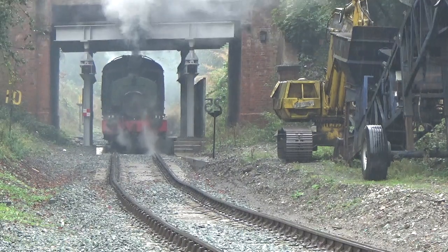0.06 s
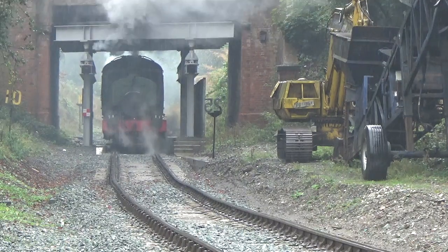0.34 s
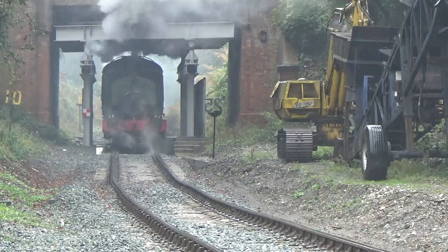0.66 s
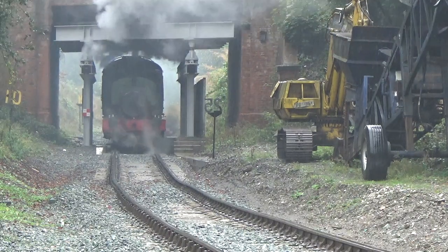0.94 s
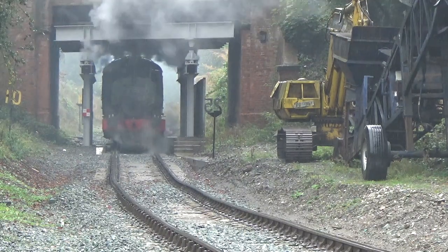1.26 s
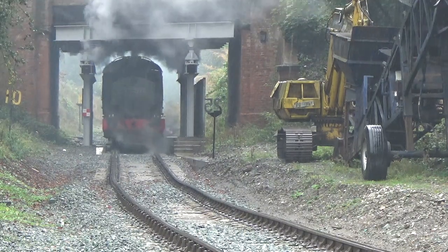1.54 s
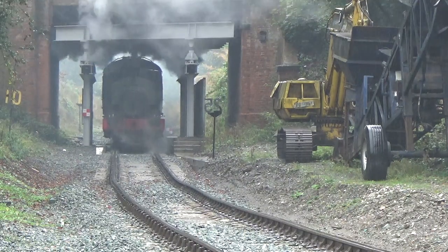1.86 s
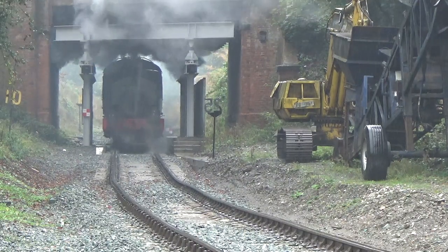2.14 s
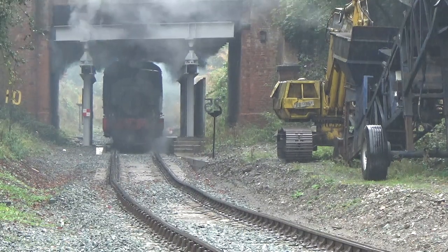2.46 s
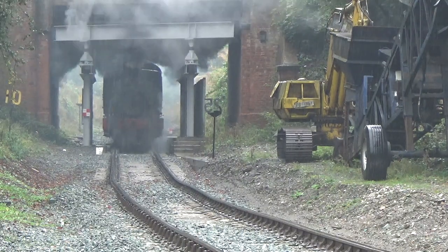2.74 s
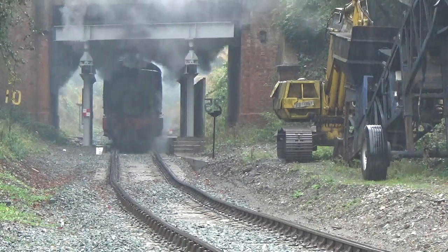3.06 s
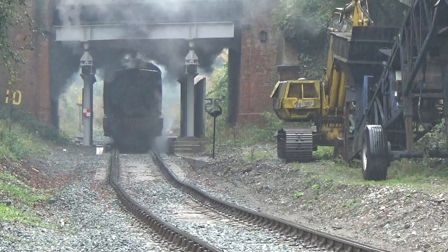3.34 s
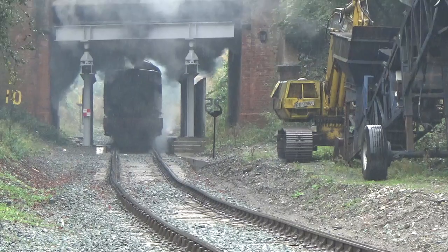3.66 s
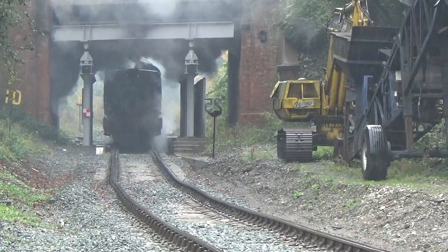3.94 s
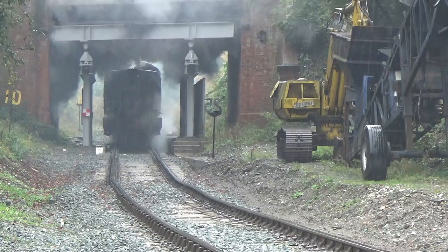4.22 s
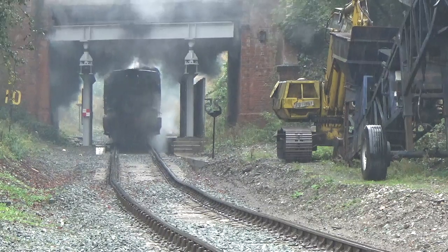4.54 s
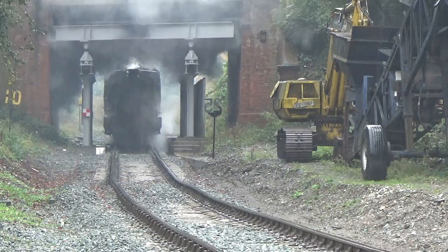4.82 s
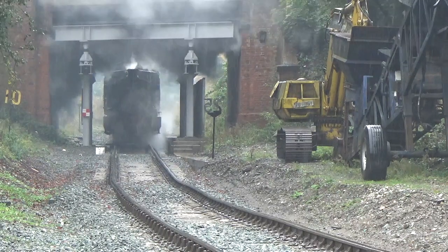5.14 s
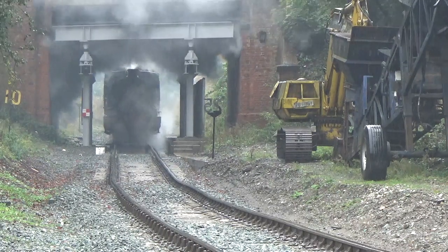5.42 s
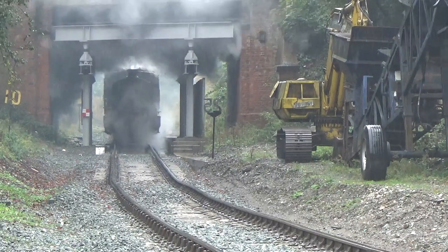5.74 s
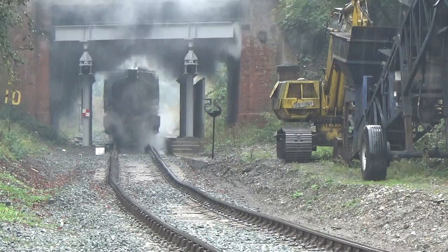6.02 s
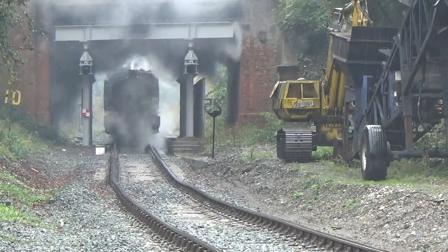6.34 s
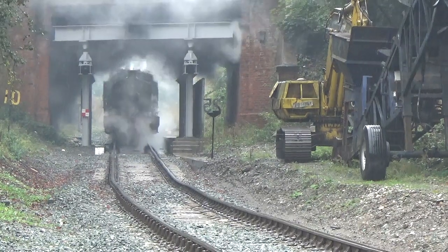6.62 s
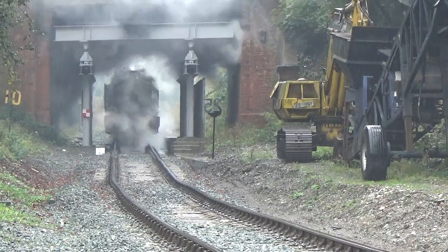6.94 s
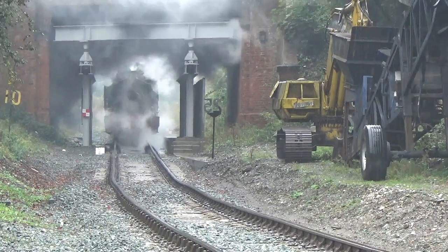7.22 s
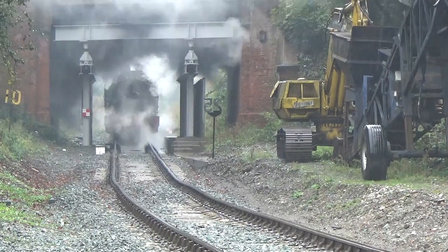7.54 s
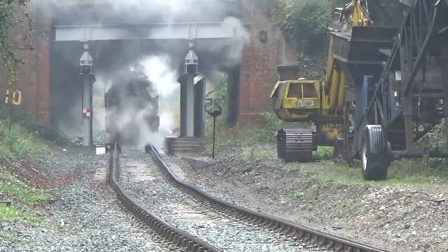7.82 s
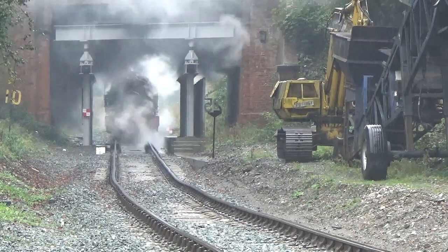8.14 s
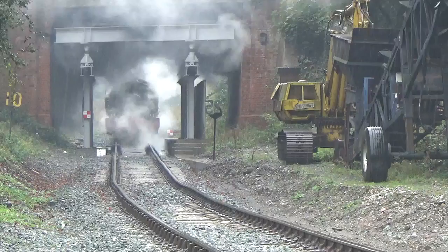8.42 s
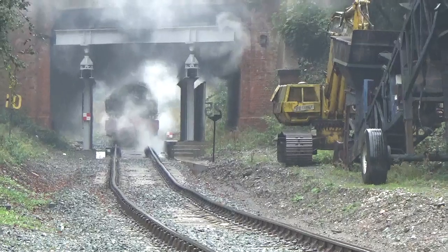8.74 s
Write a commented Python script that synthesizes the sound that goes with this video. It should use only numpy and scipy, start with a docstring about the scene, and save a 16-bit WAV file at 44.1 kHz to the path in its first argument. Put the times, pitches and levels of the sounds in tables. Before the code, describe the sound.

A steam locomotive pulls slowly away under a bridge, heard outdoors from down the track. A broad, steady hiss of steam dominates all nine seconds, with faint wavering howls inside it, slight short echoes and a quiet low rumble beneath. Softer raspy chuffs run throughout in uneven groups of four, each group lasting about a second and a half.

The steam spurts and sizzles at the start, near 2.6 seconds and near 5.9. Faint short hoots come at about 0.7, 1 and 5.3 seconds. Water spits with a sharp snap at 4.9 seconds and again, more quietly, at 6. Around 5 seconds the howling shifts slightly higher, with thin whining tones. From about 6 seconds the hiss eases a little, and its harder edge dies away after 8, leaving softer steam, a faint high whine and the continuing beat.

```python
"""Steam hisses and faintly howls from open drain cocks, heard from down the track over a low rumble.
A locomotive moves slowly off under a brick bridge; its chimney beats four uneven chuffs a wheel turn.
Ground and bridge add short echoes to the hiss, whose colour climbs as the engine draws away.
Two slugs of water spit from the cocks around the time it clears the bridge."""
import sys
import numpy as np
from scipy import signal
from scipy.fft import rfft, irfft
from scipy.io import wavfile
from scipy.ndimage import map_coordinates

SR = 44100
rng = np.random.default_rng(int(sys.argv[2]) if len(sys.argv) > 2 else 0)


def bounce(signal):
    """Save signal as a 16-bit WAV file at the path given by the first command-line argument."""
    frames = np.transpose(np.atleast_2d(signal))
    limited = np.clip(frames, -1, 1)
    pcm = np.round(limited * 32767).astype(np.int16)
    wavfile.write(sys.argv[1], SR, pcm)


N = 395577
TIME_S, FREQS_HZ = np.arange(N) / SR, np.fft.rfftfreq(N, 1 / SR)
BAND_LIMIT_HZ = 11060

# Drain cock spectra (broad hiss, hard jet, wet sizzle): freq_hz, relative_db
HISS_SPECTRUM = [(50, -55), (190, -33), (320, -17), (450, -13.5), (730, -10.5), (900, -12), (1650, -9.5),
                 (2030, -3.5), (2400, -1.5), (2950, -2.5), (3350, -4.5), (7800, -7.5), (8650, -12),
                 (13000, -12)]
JET_SPECTRUM = [(300, -55), (1200, -9), (2000, -3), (3300, -1.5), (3750, 5), (4300, 7), (5000, 2),
                (5800, -5.5), (6600, -1.5), (8000, -46)]
SIZZLE_SPECTRUM = [(2000, -60), (6000, -9), (8100, -11), (8700, -5), (9250, 6.5), (10200, 7), (11000, 1)]
# Hiss strength: time_s, level_db
HISS_LEVELS = [(0, -28), (2.6, -26.5), (5.6, -28), (6.3, -30.5), (7.6, -29), (8.97, -31.5)]
# Jet strength; sags, recovers, dies away: time_s, level_db
JET_LEVELS = [(0, -34), (1.6, -31), (4.4, -33.5), (4.75, -38), (5.1, -38), (5.45, -31.5), (6.5, -30.5),
              (6.85, -36), (8, -37), (8.25, -47), (8.97, -50)]
# Spurts of wet steam: peak_s, sigma_s, jet_db, sizzle_db
SPURTS = [(.08, .07, -31.5, -41), (1.15, 0.31, -43, -38), (2.6, .25, -36.5, -36.5), (3.55, 0.22, -43, -38),
          (4.35, .2, -39, -37), (5.85, 0.23, -33, -31.5), (7.02, 0.27, -46, -37), (8.72, 0.26, -51, -37)]
# Reflections off bridge walls and deck: delay_s, gain
BRIDGE_ECHOES = [(.0017, .08), (.0029, -.09), (.0047, .09), (.0068, .09), (.0093, -.07)]
# Steam resonances, under and beyond the bridge: pitch_hz, width_hz, under_db, beyond_db
HOWL_MODES = [(887, 50, -44.5, -48), (992, 60, -39, -39.5), (1058, 70, -50, -40), (1275, 110, -41, -45),
              (1405, 52, -48, -40), (1463, 60, -42, -37), (1715, 110, -38.3, -40), (1876, 60, -45, -41),
              (2190, 130, -40.5, -43), (2572, 70, -41.5, -40), (2747, 60, -47, -38.7),
              (7850, 400, -60, -46)]
# Gain common to those resonances: time_s, gain_db
HOWL_GAINS = [(0, 0), (4.2, 0.5), (5.1, 1), (7.5, -1), (8.97, -5.5)]
# Single resonances flaring into hoots and whines: peak_s, sigma_s, pitch_hz, width_hz, level_db
HOOTS = [(.7, 0.052, 985, 80, -34), (1.04, .06, 1000, 80, -35), (2.55, 0.07, 975, 80, -37.5),
         (3.65, 0.097, 990, 80, -39), (4.8, 0.3, 1760, 55, -38), (4.95, .3, 2610, 75, -37),
         (5.25, 0.051, 995, 77, -33), (5.65, .25, 2745, 65, -35), (7.16, 0.038, 4600, 600, -33),
         (7.45, 0.3, 1470, 100, -37.5), (8.7, 0.48, 6300, 700, -42), (8.75, .28, 10250, 450, -51)]
# Outdoor rumble spectrum: freq_hz, relative_db
RUMBLE_SPECTRUM = [(10, -35), (25, -21), (40, -11), (52, -2), (64, -3.5), (80, -1.5), (105, 3.5), (160, -2),
                   (200, -5), (270, 0), (500, -23.5)]
# Wheel turns: start_s, bark_db, rasp_db
WHEEL_TURNS = [(0.02, -37.5, -36), (1.476, -35.5, -32.5), (2.99, -37, -30.5), (4.513, -37.5, -31.5),
               (6.05, -39.5, -29.6), (7.585, -40.5, -31.5)]
# Four beats of a turn: phase_turns, bark_accent_db, rasp_accent_db
TURN_BEATS = [(0, 3, 1.1), (.263, 2.5, 1.8), (.498, -1.2, 1), (.708, -5, -3)]
# Chuff spectra (rasp, bark, boom): freq_hz, relative_db
RASP_SPECTRUM = [(150, -50), (500, -28), (800, 2), (1060, 1.5), (1150, -5), (1280, 12.5), (1400, 0.5),
                 (1750, -3.5), (2200, 4.5), (2700, -29), (5000, -4), (11000, -33)]
BARK_SPECTRUM = [(60, -55), (160, -30), (250, -16.5), (300, -9), (385, -3.5), (530, -2.5), (650, -4),
                 (740, -12), (850, -1.5), (1100, 1.5), (2000, -45), (6000, -60)]
BOOM_SPECTRUM = [(25, -35), (70, -1), (110, -2.5), (160, 10.5), (200, -13), (300, -22), (1000, -62)]
# Chimney pipe resonances: pitch_hz, width_hz, boost_db
FLUE_MODES = [(322, 32, 7.5), (441, 42, 9)]
# Loudest booms under the bridge: peak_s, level_db
BOOMS = [(0.42, -56), (2.23, -57), (4.57, -51.5), (5.362, -53), (8.72, -54)]
# Water spits: start_s, level_db
SPITS = [(4.888, -12.5), (5.972, -19)]
# Left-right likeness: freq_hz, coherence
STEREO_COHERENCE = [(30, .985), (200, .965), (2000, .96), (5000, .95), (10000, .92)]
# Level, left minus right: freq_hz, lean_db
STEREO_LEAN = [(60, -3), (97, 1), (160, 0), (250, 0), (400, 1), (650, 2), (1050, 1.0), (1700, 2),
               (2730, -0.5), (4400, -0.5), (7100, 1.5), (11400, -1.5)]
# Phase, left ahead of right: freq_hz, lead_rad
STEREO_LEAD = [(200, 0), (1000, .22), (2200, -.3), (4500, -.12), (7500, -.2), (11000, 0)]


def amp(db):
    """Decibels to gain."""
    return 10 ** (np.asarray(db) / 20)


def unit_rms(x):
    """Scale to rms 1."""
    return x / np.sqrt(np.mean(x ** 2) + 1e-20)


def over_freq(table):
    """Table value at every bin, on a log frequency axis."""
    freq_hz, value = np.transpose(table)
    return np.interp(np.log(FREQS_HZ + 1), np.log(freq_hz + 1), value)


def over_time(table):
    """Table value at every sample."""
    return np.interp(TIME_S, *np.transpose(table))


def resonance(pitch_hz, width_hz):
    """Response of one mode, 1 at centre."""
    return 1 / (1 + (1.3 * (FREQS_HZ - pitch_hz) / width_hz) ** 2)


def swell(peak_s, sigma_s):
    """Gaussian envelope, 1 at peak."""
    return np.exp(-.5 * ((TIME_S - peak_s) / sigma_s) ** 2)


def resample(x, position_samples):
    """Both channels read at fractional positions."""
    return np.array([map_coordinates(side, [position_samples], order=3, mode="nearest") for side in x])


def echo(x, delay_s):
    """Copy with a delay that may drift."""
    return resample(x, np.arange(N) - SR * delay_s)


def turbulence(gain):
    """Noise shaped by a gain per bin; rms 1, nearly alike in both ears."""
    a, b, c, d = rng.standard_normal((4, len(FREQS_HZ)))
    coherence = over_freq(STEREO_COHERENCE)
    left = a + 1j * b
    right = coherence * left + np.sqrt(1 - coherence ** 2) * (c + 1j * d)
    return unit_rms(irfft(np.array([left, right]) * gain, N))


def noise(spectrum, boost_db=0):
    """Turbulence from a spectrum table."""
    return turbulence(amp(over_freq(spectrum) + boost_db))


def wander(rate_hz):
    """Random curve, rms 1, rolled off above rate_hz."""
    return unit_rms(irfft(rfft(rng.standard_normal(N)) / (1 + (FREQS_HZ / rate_hz) ** 4), N))


def flutter(rate_hz, rms_db):
    """Randomly wavering gain."""
    return amp(rms_db * wander(rate_hz))


def bridge_fade(under_db, beyond_db, clear_s=5.22, fade_s=0.49):
    """Gain crossfade as the engine clears the bridge."""
    beyond = .5 + .5 * np.tanh((TIME_S - clear_s) / fade_s)
    return amp(under_db) * (1 - beyond) + amp(beyond_db) * beyond


def strokes(last_turn_s=1.526):
    """Piston strokes, four a wheel turn. Rows: start_s, bark_db, rasp_db."""
    lengths_s = np.append(np.diff([turn[0] for turn in WHEEL_TURNS]), last_turn_s)
    return np.array([(start_s + phase_turns * turn_s, bark_db + bark_accent_db, rasp_db + rasp_accent_db)
                     for (start_s, bark_db, rasp_db), turn_s in zip(WHEEL_TURNS, lengths_s)
                     for phase_turns, bark_accent_db, rasp_accent_db in TURN_BEATS])


def stroke_envelope(levels_db, lag_s, rise_s, decay_s):
    """Each stroke: the valve opens smoothly, the cylinder empties. Time constants apply to power."""
    power = np.zeros(N)
    for start_s, level_db in zip(strokes()[:, 0], levels_db):
        age_s = TIME_S - start_s - lag_s
        near = (age_s > -.2) & (age_s < .8)
        falloff = np.where(age_s[near] < 0, (age_s[near] / rise_s) ** 2, age_s[near] / decay_s)
        power[near] += amp(level_db) ** 2 * np.exp(-falloff)
    return np.sqrt(power)


def drain_cocks(throb=0.023):
    """Escaping steam: broad hiss, spurting jet and wet sizzle; all surge slightly with each stroke."""
    jet_power = amp(over_time(JET_LEVELS)) ** 2
    sizzle_power = bridge_fade(under_db=-37, beyond_db=-43) ** 2
    for peak_s, sigma_s, jet_db, sizzle_db in SPURTS:
        spurt = swell(peak_s, sigma_s)
        jet_power += (amp(jet_db) * spurt) ** 2
        sizzle_power += (amp(sizzle_db) * spurt) ** 2
    hiss = noise(HISS_SPECTRUM) * amp(over_time(HISS_LEVELS)) * flutter(rate_hz=11, rms_db=0.74)
    jet = noise(JET_SPECTRUM) * np.sqrt(jet_power) * flutter(rate_hz=17, rms_db=0.66)
    sizzle = noise(SIZZLE_SPECTRUM) * np.sqrt(sizzle_power) * flutter(rate_hz=180, rms_db=1.7)
    surge = stroke_envelope(np.zeros(len(strokes())), lag_s=-0.0091, rise_s=0.021, decay_s=0.13)
    return (hiss + jet + sizzle) * (1 + throb * (surge - surge.mean()))


def add_echoes(steam, comb_hz=2044, climb_hz_per_s=70, drift_per_s=0.0038):
    """Ballast and bridge echoes lag less as the engine recedes, so their comb peaks climb."""
    first_s = BRIDGE_ECHOES[0][0]
    walls = sum(gain * np.exp(-2j * np.pi * FREQS_HZ * (delay_s - first_s))
                for delay_s, gain in BRIDGE_ECHOES)
    bridge = echo(irfft(rfft(steam) * walls, N), first_s * (1 - drift_per_s * TIME_S))
    ground = echo(steam, 1 / (comb_hz + climb_hz_per_s * TIME_S))
    ground_gain = 0.038 + 0.24 * swell(peak_s=6.86, sigma_s=.6)  # strongest just beyond the bridge
    return steam + ground_gain * ground + bridge


def howls(pitch_waver=0.002003):
    """Steam excites wavering resonances; their balance shifts as the engine clears the bridge."""
    held = sum(turbulence(resonance(pitch_hz, width_hz)) * bridge_fade(under_db, beyond_db)
               * flutter(rate_hz=5, rms_db=1.2)
               for pitch_hz, width_hz, under_db, beyond_db in HOWL_MODES)
    hoots = sum(turbulence(resonance(pitch_hz, width_hz)) * amp(level_db) * swell(peak_s, sigma_s)
                for peak_s, sigma_s, pitch_hz, width_hz, level_db in HOOTS)
    speed = 1 + pitch_waver * wander(rate_hz=4)
    return resample(held * amp(over_time(HOWL_GAINS)) + hoots, np.cumsum(speed / speed.mean()))


def outdoor_rumble(level_db=-61):
    """Steady low background."""
    return noise(RUMBLE_SPECTRUM) * amp(level_db)


def chimney(boom_re_bark_db=-24.5):
    """Each blast starts with a rasp, barks in the chimney, then booms under the bridge."""
    _, bark_db, rasp_db = strokes().T
    flue_db = sum(boost_db * resonance(pitch_hz, width_hz) for pitch_hz, width_hz, boost_db in FLUE_MODES)
    rasp = noise(RASP_SPECTRUM) * stroke_envelope(rasp_db, lag_s=-0.0057, rise_s=0.033, decay_s=0.03)
    bark = noise(BARK_SPECTRUM, flue_db)
    bark *= stroke_envelope(bark_db, lag_s=.001, rise_s=0.028, decay_s=0.049)
    boom_beats = stroke_envelope(bark_db + boom_re_bark_db, lag_s=0.026, rise_s=0.031, decay_s=0.076)
    boom_accents = sum(amp(level_db) * swell(peak_s, sigma_s=.028) for peak_s, level_db in BOOMS)
    boom = noise(BOOM_SPECTRUM) * np.hypot(boom_accents, boom_beats)
    return (rasp + bark) * flutter(rate_hz=55, rms_db=1.1) + boom


def water_spits(decay_s=0.00062, low_cut_hz=700):
    """Slugs of water snap out of the cocks."""
    bursts = sum(amp(level_db) * (TIME_S >= start_s) * np.exp(-abs(TIME_S - start_s) / decay_s)
                 for start_s, level_db in SPITS)
    high_pass = signal.butter(2, low_cut_hz, "highpass", fs=SR)
    return signal.lfilter(*high_pass, bursts * turbulence(FREQS_HZ < BAND_LIMIT_HZ))


def scene():
    """Engine over outdoor rumble, stereo."""
    return outdoor_rumble() + add_echoes(drain_cocks()) + howls() + chimney() + water_spits()


def record(dry):
    """Two close microphone ports, slightly apart in level and phase; then the band limit."""
    left_port = amp(over_freq(STEREO_LEAN) / 2) * np.exp(.5j * over_freq(STEREO_LEAD))
    heard = irfft(rfft(dry) * np.array([left_port, 1 / left_port]), N)
    low_pass = signal.firwin(1023, BAND_LIMIT_HZ, window=("kaiser", 9), fs=SR)
    return signal.oaconvolve(heard, low_pass[None], "same")


dry = scene()
out = record(dry)
bounce(out)
```